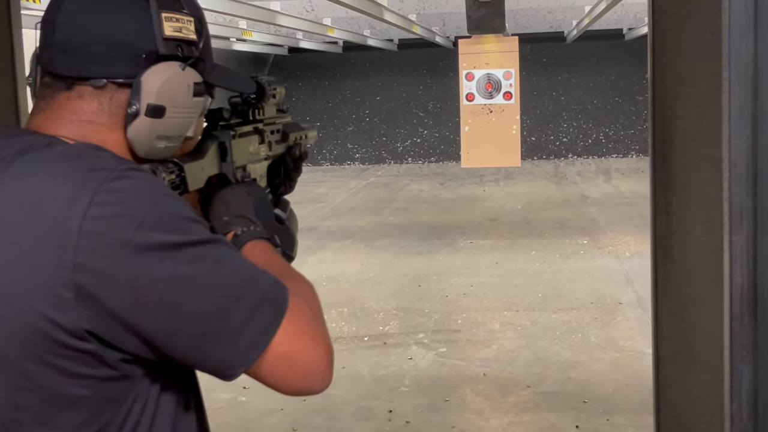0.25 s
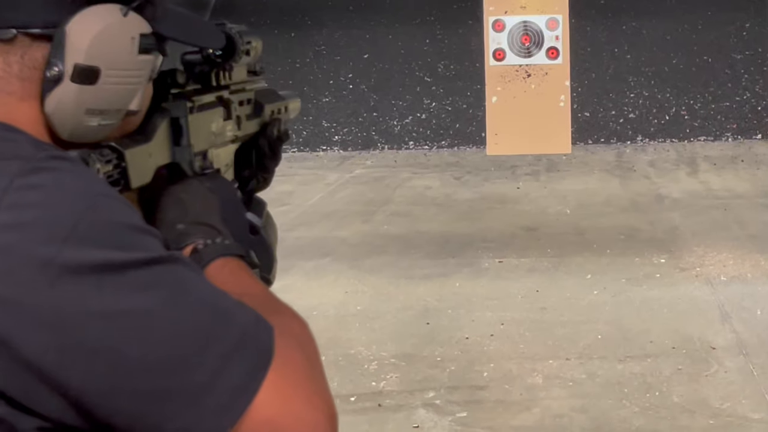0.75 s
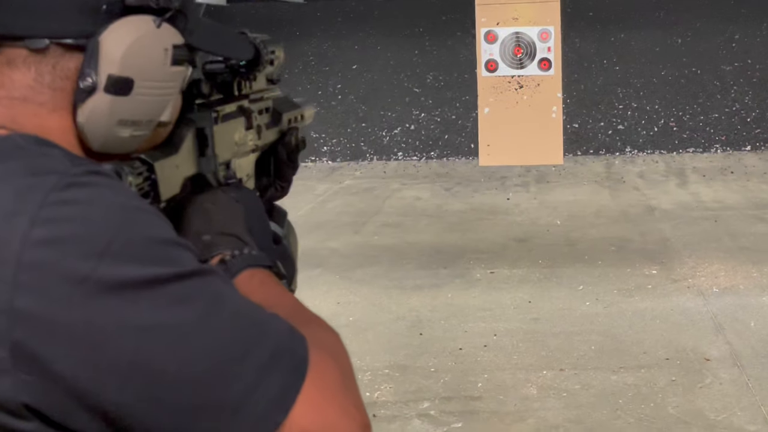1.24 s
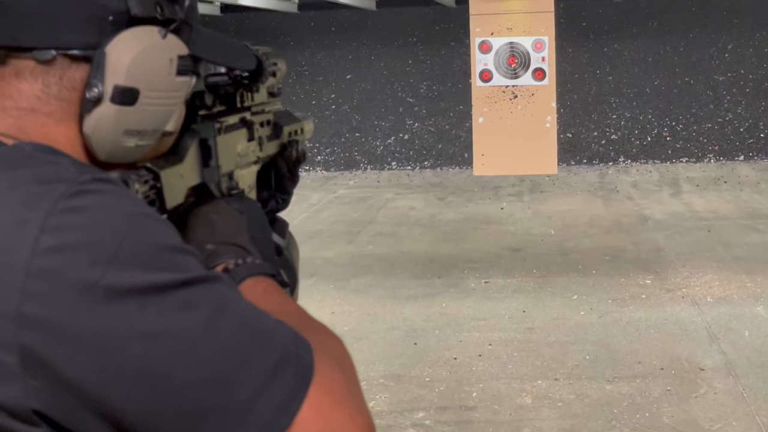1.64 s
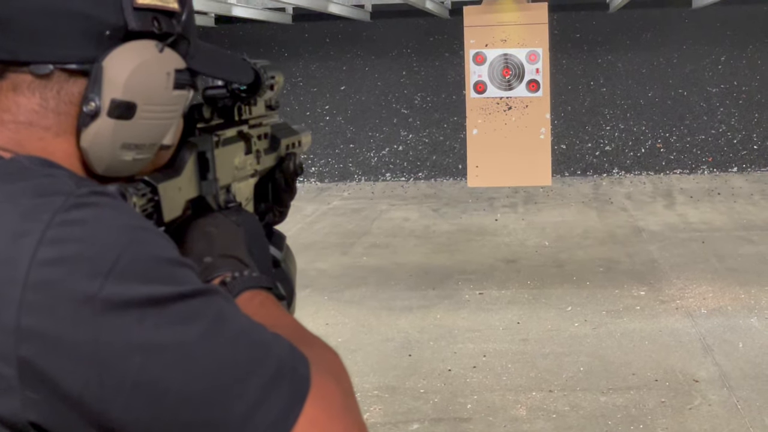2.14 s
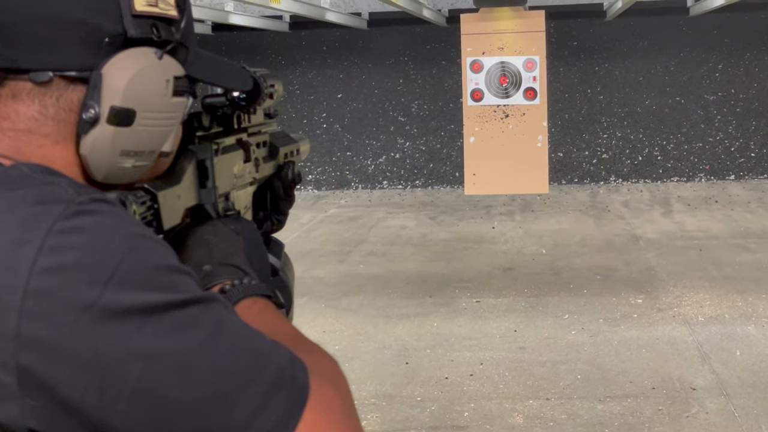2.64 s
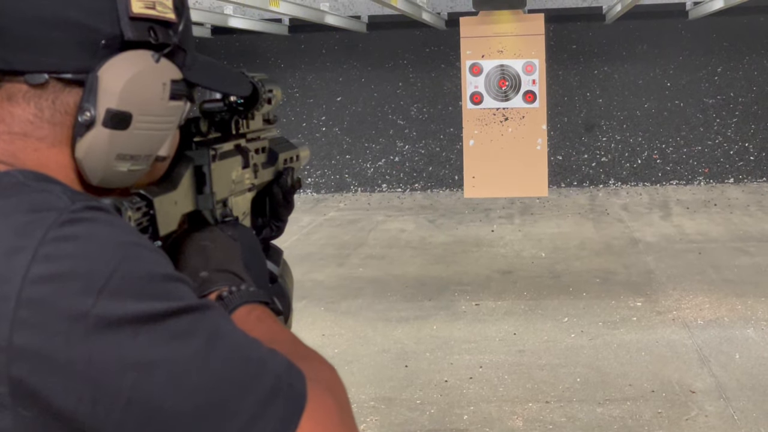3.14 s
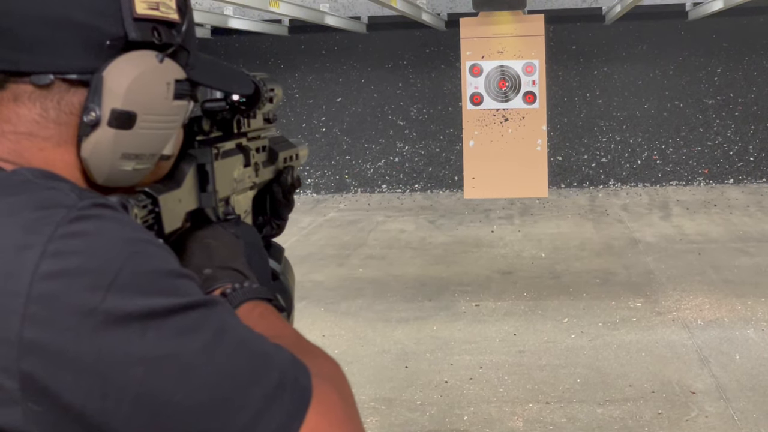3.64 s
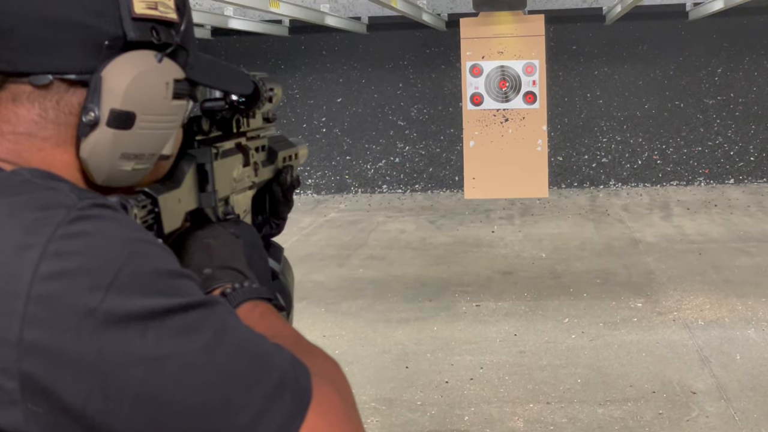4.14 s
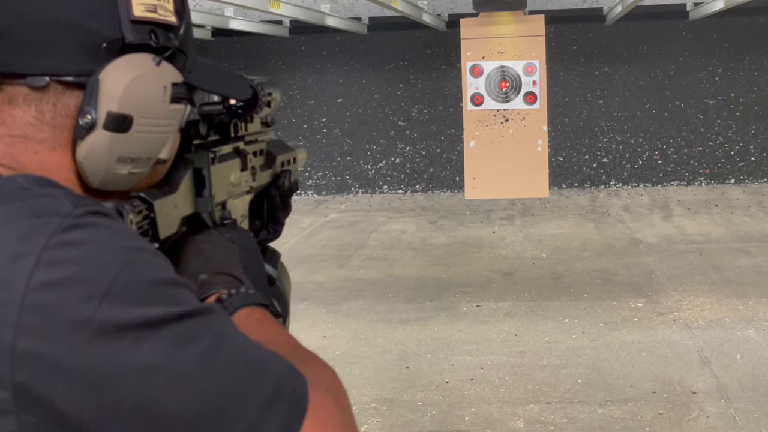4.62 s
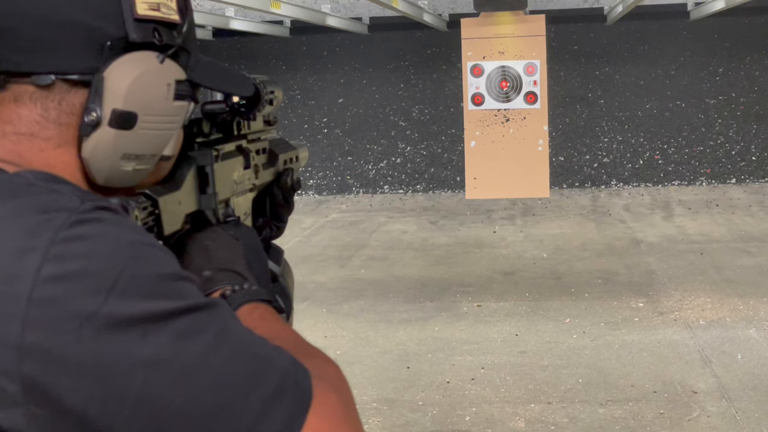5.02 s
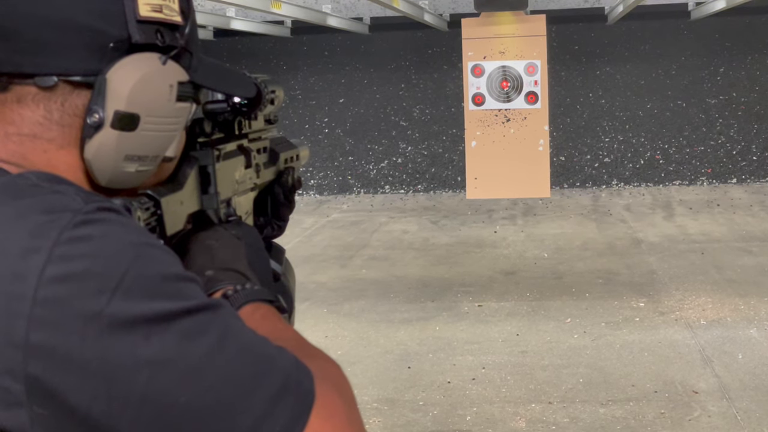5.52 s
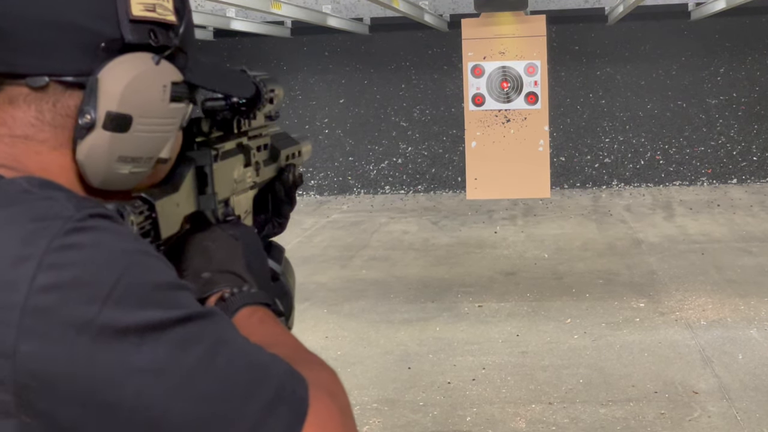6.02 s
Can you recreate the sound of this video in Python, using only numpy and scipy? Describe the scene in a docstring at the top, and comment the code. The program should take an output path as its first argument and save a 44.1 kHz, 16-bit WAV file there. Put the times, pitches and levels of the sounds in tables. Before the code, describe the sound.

A carbine fires four slow single shots in an indoor shooting range, about one and a half seconds apart, while a second gun in a nearby lane adds four more, often close beside them. Each blast overloads the microphone, slaps back from the far wall and dies away in the concrete hall. In the gaps, spent brass cases tick, ring and roll on the floor over a faint ventilation drone.

```python
"""Indoor firing range

A carbine fires slow single shots; a second gun in a nearby lane fires in between.
Each blast overloads the microphone, slaps back from the far wall and dies away in the concrete hall.
Spent brass cases tick, ring and roll on the floor; one clinks against steel. The ventilation drones."""
import sys
import numpy as np
from scipy import signal
from scipy.fft import rfft, irfft, next_fast_len
from scipy.io import wavfile
from scipy.ndimage import map_coordinates

SR = 44100
rng = np.random.default_rng(int(sys.argv[2]) if len(sys.argv) > 2 else 0)


def master(y):
    """Save y as 16-bit WAV."""
    cut = np.clip(np.atleast_2d(y).T, -1, 1)
    pcm = np.round(cut * 32767)  # scale
    wavfile.write(sys.argv[1], SR, pcm.astype(np.int16))


N = 276507
BAND_LIMIT_HZ = 15650

# shots (time [s], level [dB])
CARBINE_SHOTS = [(-0.64, -1), (1.0545, -1.5), (2.8380, 1), (4.3582, -1.5), (5.8775, 0.5)]
NEIGHBOUR_SHOTS = [(0.8655, 0), (1.1558, -1), (3.0065, 0), (4.7400, 0.5)]
# spectra of blast, hall tail and far-wall slap (frequency [Hz], density [dB])
CARBINE_BLAST_DB = [(20, -30), (35, -11), (70, 2), (140, -5), (230, 0), (330, -2), (700, -2), (1600, -13),
                    (2700, -9), (4100, -13), (6200, -8), (11500, -9), (13600, -25), (15500, -29)]
CARBINE_HALL_DB = [(20, -32), (35, -16), (80, 0), (200, -7), (550, -2), (1000, -4), (1600, -4), (2300, .5),
                   (3600, -9), (6000, -9), (9000, -8), (11500, -8), (12900, -20), (14000, -55)]
CARBINE_SLAP_DB = [(20, -24), (50, 5), (90, 5), (170, -2), (350, -3), (700, -8), (1300, -11), (2600, -8),
                   (4100, -13), (6200, -10), (9000, -13), (11500, -11), (13600, -27), (15500, -31)]
NEIGHBOUR_BLAST_DB = [(20, -32), (35, -11), (75, 2), (130, -10), (220, -3), (300, -4), (700, -4), (950, -1),
                      (1700, -9), (2900, -11), (6000, -14), (11300, -12), (13400, -27), (15500, -42)]
NEIGHBOUR_HALL_DB = [(20, -30), (35, -13), (80, 2), (130, -8), (260, -7), (480, 1), (950, -8), (2000, -12),
                     (2900, -15), (5000, -19), (8700, -21), (11600, -21), (12700, -31), (14000, -65)]
# decay in booth and hall (frequency [Hz], T60 [s])
BOOTH_T60_S = [(60, .45), (300, .3), (1200, .25), (5000, .25), (13000, .2)]
HALL_T60_S = [(60, 1.45), (160, 1.05), (450, .93), (1100, .88), (2500, .8), (5000, .65), (9000, .53),
              (13000, .43)]
# echoes along the lanes (delay [s], level [dB], low-pass cutoff [Hz])
CARBINE_LANE_ECHOES = [(.0505, -2.8, 14000), (.069, -13, 3500), (.104, -10.5, 1800)]
NEIGHBOUR_LANE_ECHOES = [(.049, -11, 1000), (.198, -23, 1000)]
# stereo width (frequency [Hz], side over mid [dB])
SIDE_DB = [(60, -12), (300, -11), (600, -10), (1300, -6), (2400, -13), (4000, -11), (6000, -20),
           (13000, -14)]
# duct air spectrum (frequency [Hz], density [dB])
AIR_DB = [(20, -30), (40, -12), (65, 0), (95, -7), (130, -6), (200, -16), (300, -23), (600, -28),
          (1000, -28), (2000, -35), (3000, -42), (5000, -45), (9000, -57), (15000, -80)]
# fan tones (frequency [Hz], level [dB])
FAN_TONES = [(64.6, -61), (129.2, -58.5), (193.8, -67), (296, -76), (958, -74.5)]
# case landings, ticking with the remaining share
# (time [s], level [dB], clack share [0-1], ring share [0-1], ring frequency [Hz])
LANDINGS = [(0.0687, -37, 0.2, 0.0, 11660), (0.1067, -37, 0.62, 0.16, 11680),
            (0.3371, -40, 0.01, 0.01, 11480), (0.5014, -55, 0.04, 0.86, 11680),
            (1.6147, -34, 0.06, 0.0, 11420), (1.8253, -34, 0.28, 0.0, 11420),
            (1.9155, -38, 0.47, 0.04, 11370), (2.1081, -41, 0.23, 0.01, 11420),
            (2.153, -55, 0.0, 0.01, 11900), (2.2662, -54, 0.67, 0.0, 11660),
            (2.3121, -34, 0.0, 0.98, 11390), (3.6865, -29, 0.0, 0.89, 11660),
            (3.904, -40, 0.19, 0.02, 11590), (3.9469, -46, 0.01, 0.18, 11540),
            (5.222, -30, 0.87, 0.0, 11380), (5.439, -48, 0.0, 0.21, 11730),
            (5.5413, -40, 0.16, 0.05, 11770), (5.8137, -39, 0.0, 0.97, 11500)]
# spectra of brass on concrete (frequency [Hz], density [dB])
CLACK_DB = [(200, -12), (900, 0), (2300, 0), (4000, -4), (7000, -20), (12000, -45)]
TICK_DB = [(1500, -32), (3800, -13), (5200, -3), (6500, 0), (9000, -1), (12500, -9), (14000, -24),
           (15500, -28)]
# steel fitting modes (frequency [Hz], level [dB], T60 [s])
STEEL_MODES = [(2250, -16, 0.96), (2632, 0, 0.15), (3898, -7, 0.46), (4280, -14, 0.3)]
# rolling cases (time [s], ring frequency [Hz], level [dB])
CASE_ROLLS = [(0.34, 9800, -66), (1.5, 9800, -64), (2.16, 9800, -66), (2.37, 9800, -57), (3.33, 9800, -58),
              (3.56, 9800, -60), (3.95, 9800, -66), (4.97, 11780, -63), (5.05, 9800, -60),
              (5.55, 11780, -57)]


def amp(db):
    """Decibels to gain."""
    return 10 ** (np.asarray(db) / 20)


def unit_rms(x):
    """Scale to rms 1."""
    return x / np.sqrt(np.mean(x ** 2) + 1e-20)


def curve_at(points, hz):
    """Interpolate (frequency [Hz], value) points on a log axis."""
    knots_hz, values = np.transpose(points)
    return np.interp(np.log(hz + 1), np.log(knots_hz + 1), values)


def filtered(x, response):
    """Apply a frequency response by FFT."""
    n = x.shape[-1]
    padded = next_fast_len(n + SR // 10)
    return irfft(rfft(x, padded) * response(np.fft.rfftfreq(padded, 1 / SR)), padded)[..., :n]


def wobble(rate_hz):
    """Smooth random curve, N samples long."""
    knots = rng.standard_normal(int(N * rate_hz / SR) + 4)
    return map_coordinates(knots, [np.arange(N) * rate_hz / SR])


def add(track, time_s, x):
    """Mix x in at time_s, cropped to the track."""
    start = round(time_s * SR)
    x = x[:, max(-start, 0):max(N - start, 0)]
    track[:, max(start, 0):][:, :x.shape[1]] += x


def diffuse(white, spectrum):
    """Two white noises to a coloured stereo field of rms 1."""
    mid, side = filtered(white, lambda hz: amp(curve_at(spectrum, hz))
                         * amp([0 * hz, curve_at(SIDE_DB, hz)]))
    return unit_rms(np.array([mid + side, mid - side]))


def decaying(x, t60_curve, t60_scale=1, swell_cycles=1.2):
    """Each band swells, bass last, and dies at its own rate."""
    hz, t, bands = signal.stft(x, SR, nperseg=256)
    swell = 1 - np.exp(-(t + .002) * (hz[:, None] + 60) / swell_cycles)
    fade = amp(-60 * t / (t60_scale * curve_at(t60_curve, hz)[:, None]))
    return signal.istft(bands * swell * fade, SR, nperseg=256)[1][:, :x.shape[1]]


def gun(shots, blast_spectrum, hall_spectrum, echo_spectrum, echoes, blast_db, hall_db,
        rise_s, build_s, blast_t60_scale, echo_t60_scale, shared, clump_db):
    """Booth blast, hall tail and echoes; shots from one spot share part of their reflection pattern."""
    out, t = np.zeros((2, N)), np.arange(SR + SR // 4) / SR
    blast_n = SR // 3
    attack = 1 - np.exp(-t[:blast_n] / rise_s)
    pattern = rng.standard_normal((2, 2, len(t)))
    # the tail builds as sound spreads through the hall; reflections arrive in clumps
    spreading = (1 - np.exp(-t / build_s)) * amp(clump_db * wobble(60)[:len(t)])
    for time_s, db in shots:
        near, far = np.sqrt(shared) * pattern + np.sqrt(1 - shared) * rng.standard_normal(pattern.shape)
        blast = decaying(diffuse(near[:, :blast_n], blast_spectrum), BOOTH_T60_S, blast_t60_scale)
        tail = decaying(diffuse(far, hall_spectrum), HALL_T60_S)
        add(out, time_s, amp(db + blast_db) * blast * attack)
        add(out, time_s, amp(db + hall_db) * tail * spreading)
        for delay_s, echo_db, cutoff_hz in echoes:
            scatter = diffuse(rng.standard_normal((2, SR // 5)), echo_spectrum)
            lowpass = signal.butter(2, cutoff_hz, fs=SR, output="sos")
            echo = signal.sosfilt(lowpass, decaying(scatter, BOOTH_T60_S, echo_t60_scale))
            add(out, time_s + delay_s, amp(db + blast_db + echo_db) * echo)
    return out


def ventilation(air_db, waver_db):
    """Air rumbles in the ducts; the fan tones waver."""
    t = np.arange(N) / SR
    air = amp(air_db + .8 * wobble(5)) * diffuse(rng.standard_normal((2, N)), AIR_DB)
    hum = sum(amp(db + waver_db * wobble(6)) * np.sin(2 * np.pi * hz * t + .7 * wobble(7))
              for hz, db in FAN_TONES)
    return air + hum


def landing_cases(tick_db, ring_db, contact_s, ring_rise_s, ring_s, room_s, spread_hz):
    """Brass ticks on concrete: landing flat it clacks, on its rim the mouth rings in close modes."""
    out, t = np.zeros((2, N)), np.arange(SR // 3) / SR
    room_tail = np.exp(-t / room_s)
    contact_env = np.exp(-t / contact_s) + amp(-21) * room_tail
    ring_env = (1 - np.exp(-t / ring_rise_s)) * (np.exp(-t / ring_s) + amp(-26) * room_tail)
    for time_s, db, clack_share, ring_share, ring_hz in LANDINGS:
        tick_share = max(1 - clack_share - ring_share, 0)
        clack = np.sqrt(clack_share) * diffuse(rng.standard_normal((2, len(t))), CLACK_DB)
        tick = np.sqrt(tick_share) * amp(tick_db) * diffuse(rng.standard_normal((2, len(t))), TICK_DB)
        modes_hz = ring_hz + spread_hz * rng.uniform(-1, 1, size=(8, 1))
        modes = np.sin(2 * np.pi * (modes_hz * t + rng.random(modes_hz.shape)))
        ring = np.sqrt(ring_share) * amp(ring_db) * unit_rms(modes.sum(0))
        add(out, time_s, amp(db) * ((clack + tick) * contact_env + ring * ring_env))
    return out


def steel_clink(time_s, level_db, rise_s, rattle_rad):
    """A case glances off a steel fitting, which rings and rattles."""
    out, t = np.zeros((2, N)), np.arange(SR // 2) / SR
    ring = np.zeros((1, len(t)))
    for hz, db, t60_s in STEEL_MODES:
        phase = 2 * np.pi * hz * t + rattle_rad * wobble(250)[:len(t)]
        ring += amp(db - 60 * t / t60_s) * np.sin(phase)
    add(out, time_s, amp(level_db) * ring * (1 - np.exp(-t / rise_s)))
    return out


def rolling_cases(rise_s, fade_db_per_s, flutter_db, width_hz):
    """A rolling case keeps one high mode ringing, unevenly and ever more faintly."""
    out, t = np.zeros((2, N)), np.arange(SR) / SR
    envelope = (1 - np.exp(-t / rise_s)) * amp(-fade_db_per_s * t)
    for time_s, ring_hz, db in CASE_ROLLS:
        white = rng.standard_normal((1, len(t)))
        ring = filtered(white, lambda hz: np.exp(-((hz - ring_hz) / width_hz) ** 2))
        add(out, time_s, amp(db) * unit_rms(ring) * envelope)
    return out * amp(flutter_db * wobble(18))


def scene():
    """Two guns, spent brass and ventilation, in stereo."""
    carbine = gun(CARBINE_SHOTS, CARBINE_BLAST_DB, CARBINE_HALL_DB, CARBINE_SLAP_DB,
                  CARBINE_LANE_ECHOES, blast_db=4.9, hall_db=-6, rise_s=.004, build_s=.055,
                  blast_t60_scale=.37, echo_t60_scale=.23, shared=.3, clump_db=1)
    neighbour = gun(NEIGHBOUR_SHOTS, NEIGHBOUR_BLAST_DB, NEIGHBOUR_HALL_DB, NEIGHBOUR_BLAST_DB,
                    NEIGHBOUR_LANE_ECHOES, blast_db=1.1, hall_db=-12.8, rise_s=.0006, build_s=.04,
                    blast_t60_scale=.82, echo_t60_scale=.6, shared=.6, clump_db=1.2)
    guns = (carbine + neighbour) * amp([[.25], [-.25]])  # slightly left
    brass = landing_cases(tick_db=-.5, ring_db=1.5, contact_s=.005, ring_rise_s=.0015, ring_s=.024,
                          room_s=.055, spread_hz=200)
    brass += rolling_cases(rise_s=.015, fade_db_per_s=48, flutter_db=3, width_hz=65)
    brass += steel_clink(time_s=.108, level_db=-52, rise_s=.0015, rattle_rad=1.1)
    return guns + brass + ventilation(air_db=-51.7, waver_db=3)


def record(dry, port_hz=10230, port_width_hz=1700, clip_hardness=7):
    """The right microphone port resonates and turns the phase; blasts clip; the band is limited."""
    port = lambda hz: port_hz ** 2 - hz ** 2 + 1j * hz * port_width_hz
    right = filtered(dry[1], lambda hz: np.conj(port(hz)) / port(hz))  # all-pass
    mic = np.array([dry[0], right])
    clipped = mic / (1 + np.abs(mic) ** clip_hardness) ** (1 / clip_hardness)
    return filtered(clipped, lambda hz: np.clip((BAND_LIMIT_HZ - hz) / 200 + .5, 0, 1))


dry = scene()
out = record(dry)
master(out)
```